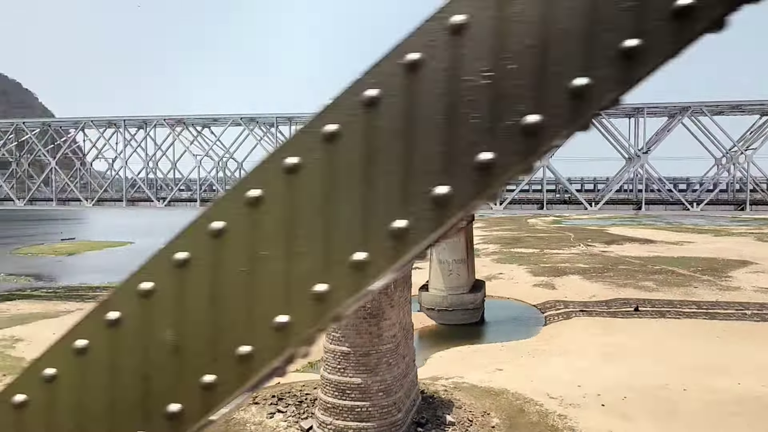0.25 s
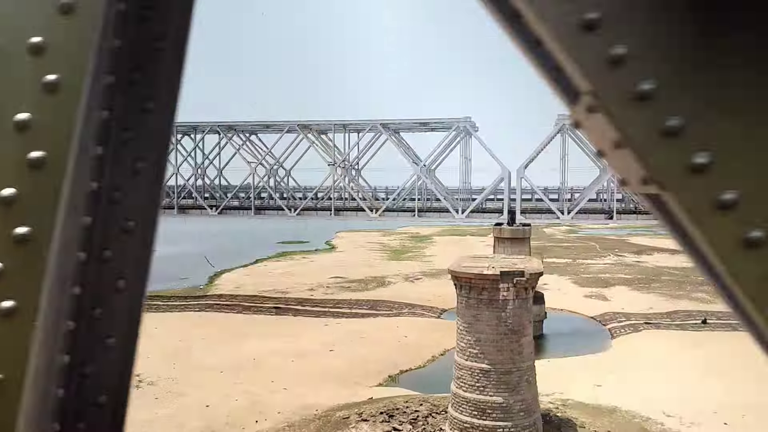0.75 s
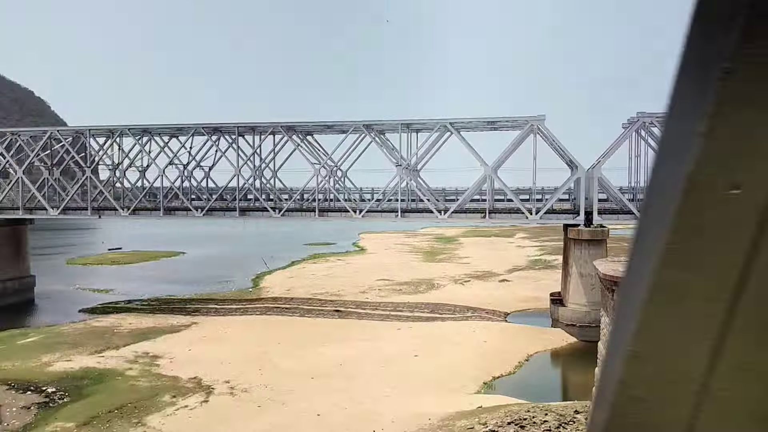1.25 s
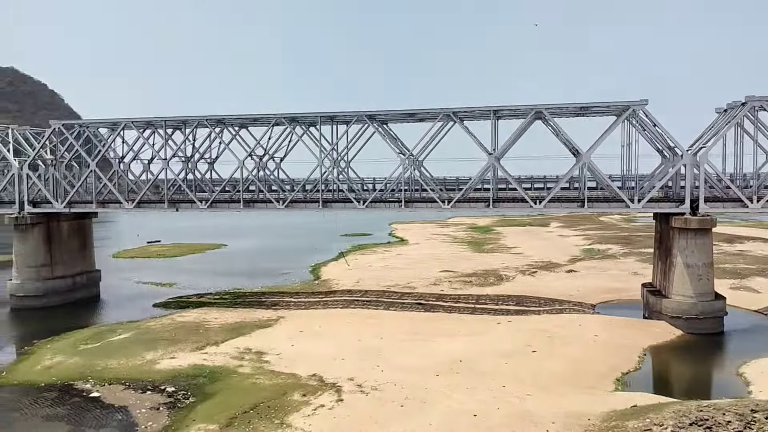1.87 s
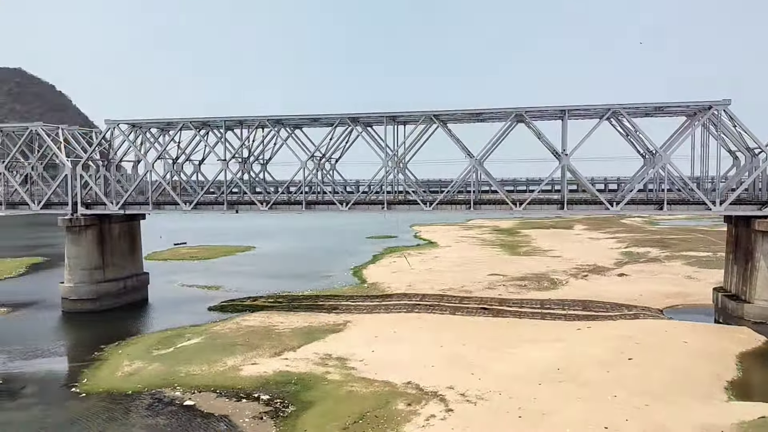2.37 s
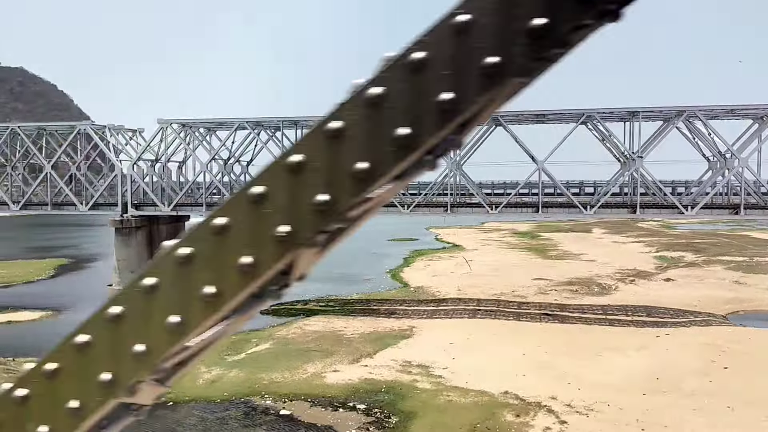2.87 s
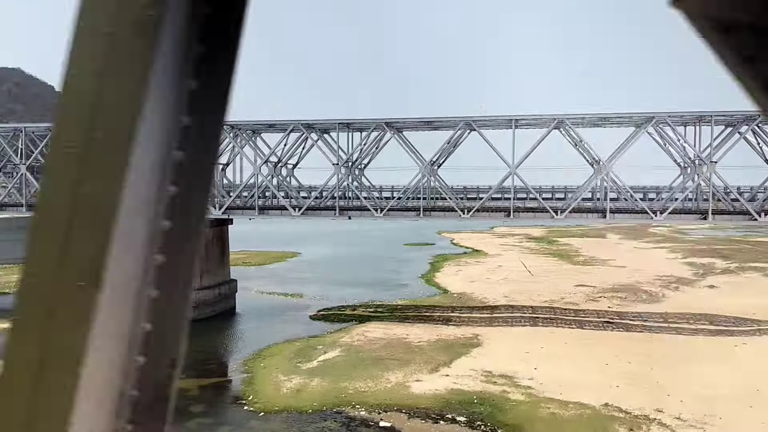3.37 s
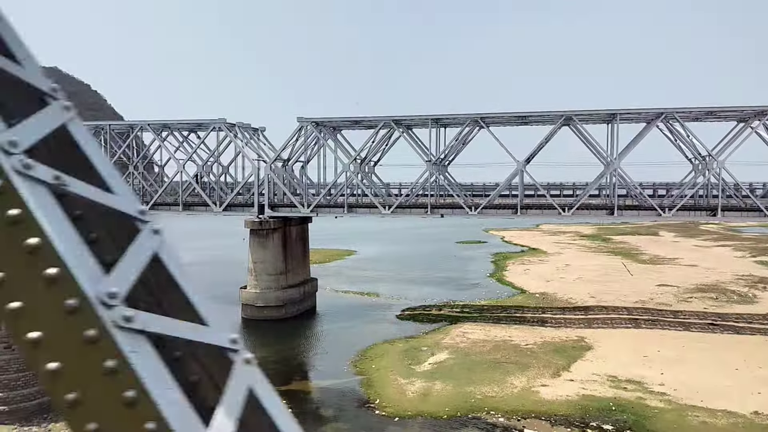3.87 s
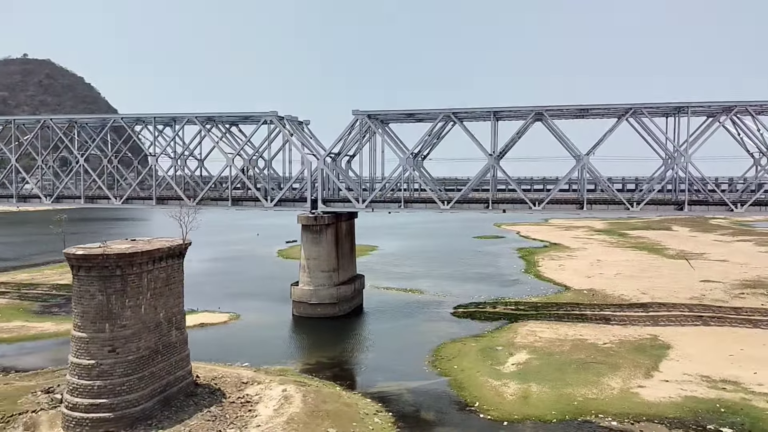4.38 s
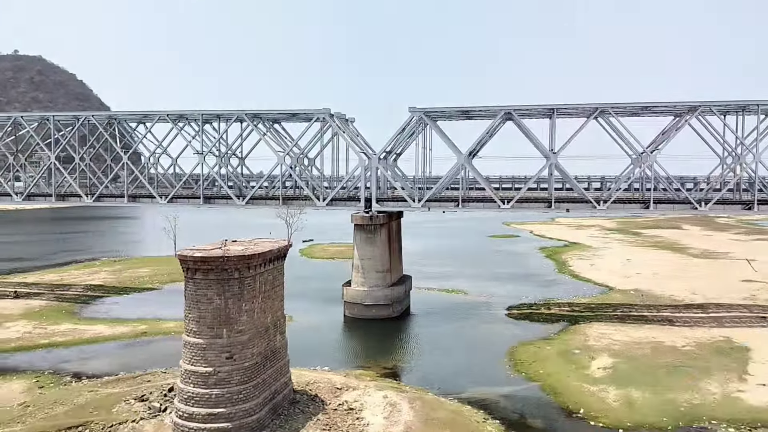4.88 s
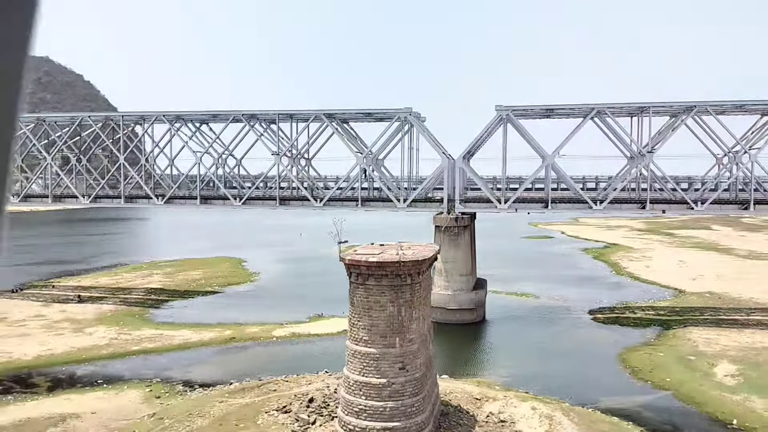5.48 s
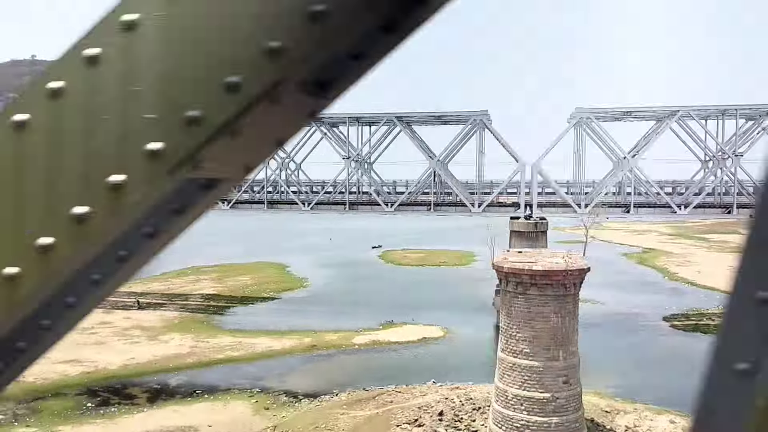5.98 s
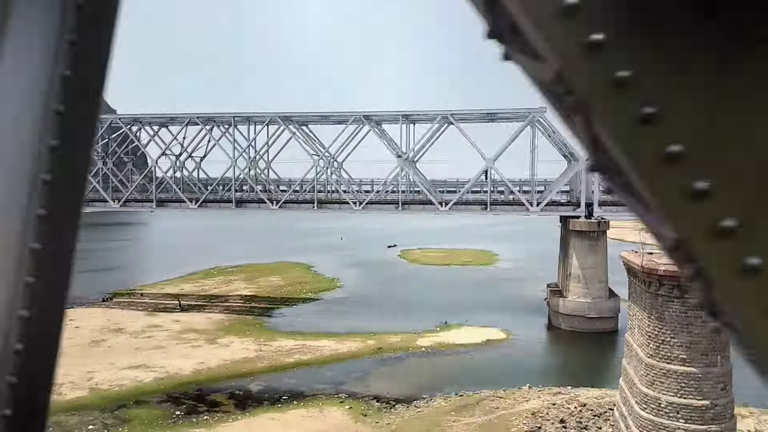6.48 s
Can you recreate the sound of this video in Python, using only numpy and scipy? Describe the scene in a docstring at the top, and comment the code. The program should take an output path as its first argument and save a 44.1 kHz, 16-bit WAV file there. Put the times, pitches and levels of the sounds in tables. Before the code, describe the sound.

A passenger train crosses a steel truss bridge, heard from inside the coach by an open window. The deck booms under the wheels while the rails roar and hiss. Quick, uneven thumps set loose steel rattling, with the brightest crashes about a second in. The clatter eases, a few faint squeaks pass, and heavier knocks return near the end. Light wind buffets the microphone.

```python
"""Coach on a steel truss bridge

Heard by an open window, the deck booms under the wheels while the rails roar and hiss. Each wheel that
strikes a joint or sleeper plate sets loose steel rattling, with a few squeaks, pings and ticks. The coach
resonates at a few pitches; the two microphone ports agree only in the bass, and wind buffets them."""
import sys
import numpy as np
from scipy import signal
from scipy.fft import rfft, irfft, next_fast_len
from scipy.io import wavfile
from scipy.ndimage import uniform_filter1d, map_coordinates

SR = 44100
rng = np.random.default_rng(int(sys.argv[2]) if len(sys.argv) > 2 else 0)


def pcm_store(signal):
    """Save signal as 16-bit PCM."""
    levels = np.round(np.clip(np.atleast_2d(signal), -1, 1) * 32767)
    wavfile.write(sys.argv[1], SR, levels.astype(np.int16).T)


N = 297234

# Vibration of the bridge: (time [s], girder throb [dB], deck boom [dB])
DECK_LEVELS = [(0.0, -24, -17), (0.17, -24, -16.5), (0.3, -18, -12), (0.5, -25, -17), (0.75, -19.5, -15.5),
               (1.15, -32, -20.5), (1.3, -25, -15), (1.65, -32.5, -24), (2.15, -32, -21.5),
               (2.45, -30.5, -22), (3.35, -28, -21), (3.8, -28, -19.5), (4.05, -25.5, -21.5),
               (4.6, -24.5, -16), (5.05, -26.5, -19.5), (5.5, -17, -15.5), (5.85, -25, -16),
               (6.1, -25, -21.5), (6.32, -24.5, -20), (6.74, -24, -21)]
# One brief dip in the boom: (centre [s], half length [s], gain [dB])
BOOM_DIP = (0.12, 0.038, -11.5)
# Rolling noise: (time [s], roar [dB], hiss [dB])
ROLLING_LEVELS = [(0.0, -18, -37), (0.2, -24.5, -39.5), (0.8, -18.5, -30.5), (1.1, -24.5, -40),
                  (1.6, -25.5, -46), (2.5, -23, -44.5), (3.3, -21.5, -44), (4.1, -21, -39.5),
                  (4.6, -19.5, -41), (5.2, -21, -40.5), (5.6, -22.5, -40), (5.9, -20, -37), (6.2, -27, -45),
                  (6.74, -25.5, -45)]
# Puffs of wind: (time [s], level [dB], half length [s])
WIND_PUFFS = [(0.08, -16, 0.021), (.24, -27, .05), (3.9, -34, .03), (4.158, -26, .025), (4.46, -33, .03),
              (5.77, -27, 0.026)]
# Wheel impacts: (time [s], crash [dB], thud [dB], rise [s], nominal t60 [s])
WHEEL_BLOWS = [(0.171, -28.5, -12, .024, 0.99), (0.318, -24, -15, 0.014, 0.46),
               (0.492, -24.5, -30, 0.067, 0.86), (0.608, -22, -18, .04, 0.68),
               (0.681, -14, -7, 0.012, 0.21), (0.75, -13.5, -26, .038, 0.12),
               (0.835, -28.5, -14.5, 0.019, .72), (0.93, -19.5, -13.5, 0.031, 0.32),
               (0.987, -18.5, -33, 0.04, 0.25), (1.094, -31, -19.5, .006, 0.59),
               (1.154, -20, -14, 0.05, .29), (1.264, -34, -20.5, 0.0031, 0.92),
               (1.411, -28, -14, 0.047, 0.33), (1.798, -29, -17, 0.038, 0.19), (2.095, -41, -21, 0.018, 1),
               (2.257, -32.5, -17, .044, 0.34), (2.423, -30.5, -16.5, 0.023, 0.17),
               (2.557, -34.5, -21, 0.036, .2), (2.703, -38.5, -20, .008, .37),
               (2.854, -30, -10, 0.035, 0.21), (3.006, -36, -17.5, .041, 0.29),
               (3.295, -37.5, -26.5, .024, 0.93), (3.445, -29.5, -11, 0.068, 0.38),
               (3.498, -26, -22, .045, 0.16), (3.845, -41, -29, .005, .7), (3.978, -29, -15, 0.015, .19),
               (4.027, -25, -9, 0.023, 0.14), (4.171, -28, -10.5, .027, 0.12),
               (4.249, -32, -20, .022, 0.23), (4.312, -37.5, -22, .007, .43),
               (4.385, -28, -19, 0.036, 0.21), (4.485, -36.5, -24, 0.047, 1), (4.725, -22, -19, 0.048, .19),
               (4.887, -30, -33, .006, 0.18), (4.91, -22, -21, .01, .092), (5.17, -36, -19, 0.0079, 0.53),
               (5.266, -25, -10, .055, 0.79), (5.396, -27, -16.5, 0.016, 1),
               (5.656, -22.5, -21, 0.063, 0.4), (5.728, -30, -13.5, .011, .8),
               (5.765, -29, -26, .011, 0.91), (5.887, -23, -8.5, 0.041, 0.5),
               (5.95, -18.5, -20, 0.052, 0.44), (6.126, -29.5, -14.5, .049, .74),
               (6.265, -26.5, -14.5, 0.017, 0.72), (6.414, -27.5, -14, 0.026, 0.51),
               (6.642, -32, -12.5, .013, .09)]
# Hard jolts of the axles on the deck: (time [s], peak [dB])
HARD_JOLTS = [(0.179, -8), (0.248, -8), (0.3, -8), (0.362, -6), (0.422, -7.5), (0.641, -14.5), (0.722, -5),
              (0.873, -5), (0.967, -5), (1.183, -12.5), (1.281, -3.5), (1.38, -10.5), (1.435, -10),
              (1.629, -12.5), (2.244, -6), (2.388, -11), (2.486, -8), (2.788, -10), (2.862, -10.5),
              (3.342, -13), (3.476, -12), (3.761, -7), (3.885, -9), (3.908, -6.5), (4.024, -3.5),
              (4.077, -7.5), (4.416, -4.5), (4.58, -8), (4.698, -5), (4.76, -6), (5.004, -11), (5.176, -7),
              (5.279, -13), (5.398, -4.5), (5.459, -4.5), (5.535, -9), (5.582, -5.5), (5.652, -17),
              (5.752, -1.5), (5.879, -9), (5.992, -5.5), (6.253, -9), (6.539, -10)]
# Modes of the deck plates: (frequency [Hz], relative level [dB], t60 [s])
DECK_MODES = [(80.5, -8.5, 0.14), (118.2, 0.5, 0.19), (151, -6, 0.13), (230, -9.5, 0.073), (310, -8, 0.077),
              (441, -14, 0.064)]
# Squeaks and pings, plus two short bright ticks of fizz on wheel impacts:
# (time [s], frequency [Hz], linewidth [Hz], level [dB], length [s])
SQUEAKS_AND_TICKS = [(0.69, 5990, 900, -17, 0.011), (0.937, 11900, 1000, -38, 0.028),
                     (.99, 12000, 1200, -44, 0.077), (3.207, 4200, 150, -43, 0.042),
                     (3.985, 14200, 2500, -50, .03), (4.03, 4300, 150, -40, 0.035),
                     (4.306, 4250, 150, -36, .05), (4.375, 4230, 100, -43, 0.043),
                     (4.91, 14000, 2500, -56, .03)]

# Spectra of the noise bands: (frequency [Hz], relative density [dB])
THROB_SPECTRUM = [(12, -50), (20, -29), (38, -16.5), (64, -3), (92, -4.5), (120, -35), (200, -120)]
BOOM_SPECTRUM = [(54, -41), (92, -6), (124, 0.5), (194, -5.5), (230, -11), (300, -54), (510, -120)]
ROAR_SPECTRUM = [(140, -32), (230, 1.5), (448, -6.5), (485, -11), (667, -7.5), (744, -12.5), (905, -11),
                 (1300, -19), (1690, -59), (2860, -120)]
RING_SPECTRUM = [(760, -14.5), (1300, -5.5), (1460, -2), (2270, -2.5), (3000, -9), (3900, -36),
                 (6600, -120)]
HISS_SPECTRUM = [(1760, -28), (3000, -3.5), (3720, -3.5), (4100, -3), (6110, -9.5), (8200, -20.5),
                 (10700, -56), (18000, -120)]
FIZZ_SPECTRUM = [(4820, -18), (8200, -10.5), (8810, -2), (12300, -5.5), (15600, -13)]
WIND_SPECTRUM = [(12, -30), (25, 2), (120, -3), (250, -18), (500, -60)]
THUD_SPECTRUM = [(140, -19.5), (230, -1), (402, -5.5), (448, -6.5), (489, -6.5), (898, -14), (1300, -20),
                 (1690, -51), (2860, -120)]
CLANG_SPECTRUM = [(760, -18), (1300, -0.5), (1590, -1), (2310, 1), (3000, -4.5), (3900, -33), (6600, -120)]
CRASH_SPECTRUM = [(1760, -21.5), (3000, -3.5), (4340, -3.5), (5380, -8.5), (6130, -7.5), (8200, -19),
                  (10700, -50), (18000, -120)]

# Coach modes, in phase and in antiphase at the ports: (frequency [Hz], bandwidth [Hz], gain [dB])
IN_PHASE_MODES = [(79.5, 16, 5.5), (121.5, 28, 7.5), (165, 24, 6.5), (293, 31, 4.5), (446.4, 12.4, 4.5),
                  (609, 21, 2), (678, 20, 1.5), (881, 16, 7), (932, 39, 4.5), (1190, 49, 4),
                  (2360, 100, 1.5), (4250, 180, 0), (5740, 450, -0.5), (12000, 700, 2.5)]
ANTIPHASE_MODES = [(120, 27, 4), (293, 50, 7.8), (418, 26, 7), (612, 37, 3), (974, 97, 4.2),
                   (1200, 67, 2.6)]
# Stereo width of the sound field: (frequency [Hz], side over mid [dB])
SIDE_LEVELS = [(60, -24), (110, -24.5), (200, -17.5), (380, -7.5), (700, -3), (1290, 2), (2380, -0.5),
               (4400, 0.5), (8120, 0), (15000, 1.5)]
# Bias toward the window: (frequency [Hz], left over right [dB])
WINDOW_BIAS = [(60, 0), (110, 1), (200, 2), (380, 2.5), (700, 1.5), (1290, 3), (2380, 3), (4400, 1),
               (8120, 1), (15000, 7)]


def amp(db):
    """Amplitude ratio of a level in decibels."""
    return 10 ** (np.asarray(db) / 20)


def unit_rms(x):
    """The signal normalised to rms 1."""
    return x / np.sqrt(np.mean(x ** 2) + 1e-20)


def level_at(points, hz):
    """Interpolation of levels on a logarithmic frequency axis."""
    frequencies, levels = np.transpose(points)
    return np.interp(np.log(hz + 1), np.log(frequencies + 1), levels)


def envelopes(rows):
    """Linear interpolation in time: each level column at every sample."""
    times, *columns = np.transpose(rows)
    return [np.interp(np.arange(N) / SR, times, column) for column in columns]


def wobble(rate_hz):
    """Smooth random modulation: a spline through Gaussian knots."""
    knots = rng.standard_normal(int(N * rate_hz / SR) + 4)
    return map_coordinates(knots, [np.arange(N) * rate_hz / SR])


def filtered(x, response):
    """Linear filtering: the spectrum is multiplied by a frequency response."""
    size = next_fast_len(N + SR // 2)
    return irfft(rfft(x, size) * response(np.fft.rfftfreq(size, 1 / SR)), size)[..., :N]


def resonances(modes, hz):
    """Superposition of the direct sound and damped second-order resonances."""
    return 1 + sum((amp(db) - 1) * 1j * hz * width / (centre ** 2 - hz ** 2 + 1j * hz * width)
                   for centre, width, db in modes)


def coach_response(hz):
    """Cavity modes: those in phase at the ports colour the mid, those across the coach the side."""
    mid = resonances(IN_PHASE_MODES, hz)
    side = resonances(ANTIPHASE_MODES, hz) * amp(level_at(SIDE_LEVELS, hz))
    return np.array([mid, side])


def steel_noise(spectrum, patchy_db, grain_db):
    """Many tiny impacts sum to rough noise, filtered by the coach; stereo, rms 1."""
    grains = rng.standard_normal((2, N)) * amp(grain_db * wobble(400))
    spectrogram = signal.stft(grains, nperseg=512)[2]
    patches = uniform_filter1d(rng.standard_normal(spectrogram.shape[1:]), 5, axis=0)  # over frequency
    patches = uniform_filter1d(patches, 8, axis=1)  # over time
    rattle = signal.istft(spectrogram * amp(patchy_db * unit_rms(patches)), nperseg=512)[1][:, :N]
    mid, side = filtered(rattle, lambda hz: amp(level_at(spectrum, hz)) * coach_response(hz))
    return unit_rms(np.array([mid + side, mid - side]))


def deck_rumble():
    """Forced vibration: the moving load makes the girders throb and the deck plates boom."""
    throb_db, boom_db = envelopes(DECK_LEVELS)
    centre, half_length, dip_db = BOOM_DIP
    dip = amp(dip_db * np.exp(-((np.arange(N) / SR - centre) / half_length) ** 4))
    throb = amp(throb_db) * steel_noise(THROB_SPECTRUM, patchy_db=-1.8, grain_db=-0.8)
    boom = amp(boom_db) * steel_noise(BOOM_SPECTRUM, patchy_db=0.07, grain_db=0.3)
    return throb + dip * boom


def rolling_noise():
    """Roughness excitation: uneven wheels and rails drive four bands that waver together."""
    roar_db, hiss_db = envelopes(ROLLING_LEVELS)
    ring_db = 0.47 * roar_db + 0.53 * hiss_db - 1.5
    fizz_db = hiss_db - 20.5
    uneven = wobble(rate_hz=16)
    roar = amp(roar_db + 0.5 * uneven) * steel_noise(ROAR_SPECTRUM, patchy_db=0.77, grain_db=0.66)
    ring = amp(ring_db + 0.36 * uneven) * steel_noise(RING_SPECTRUM, patchy_db=1.5, grain_db=1.1)
    hiss = amp(hiss_db + 0.52 * uneven) * steel_noise(HISS_SPECTRUM, patchy_db=1.76, grain_db=0.6)
    fizz = amp(fizz_db + 0.6 * uneven) * steel_noise(FIZZ_SPECTRUM, patchy_db=0.7, grain_db=1.5)
    return roar + ring + hiss + fizz


def wind_buffeting():
    """Turbulent pressure: eddies uncorrelated at the two ports, plus a few puffs in antiphase."""
    t = np.arange(N) / SR
    eddies = unit_rms(filtered(rng.standard_normal((3, N)), lambda hz: amp(level_at(WIND_SPECTRUM, hz))))
    buffets = amp(-41 + 2.1 * np.array([wobble(7), wobble(4.1)]))
    puffs = sum(amp(db) * np.exp(-((t - centre) / half) ** 2) for centre, db, half in WIND_PUFFS)
    return buffets * eddies[:2] + puffs * eddies[2] * np.array([[1], [-1]])


def wheel_clatter():
    """Each blow swells as it spreads through the steel, then decays; incoherent blows add in power."""
    power = np.zeros((4, N + SR))
    t = np.arange(SR * 3 // 4) / SR
    for start, crash_db, thud_db, rise, t60 in WHEEL_BLOWS:
        clang_db = crash_db + 4
        fizz_db = crash_db - 17.5 + 0.1 * (crash_db + 30)  # harder blows are brighter
        band_db = np.array([thud_db, clang_db, crash_db, fizz_db])[:, None]
        band_t60 = max(t60, 0.03) * np.array([[1.15], [1.1], [1], [0.9]])  # treble dies first
        envelope = (1 - np.exp(-t / rise)) * amp(band_db - 60 * t / band_t60)
        power[:, round(start * SR):][:, :len(t)] += envelope ** 2
    thud, clang, crash, fizz = np.sqrt(power[:, :N])
    return (thud * steel_noise(THUD_SPECTRUM, patchy_db=1.43, grain_db=0.1)
            + clang * steel_noise(CLANG_SPECTRUM, patchy_db=0.37, grain_db=-0.4)
            + crash * steel_noise(CRASH_SPECTRUM, patchy_db=1.0, grain_db=-0.4)
            + fizz * steel_noise(FIZZ_SPECTRUM, patchy_db=1.0, grain_db=1.0))


def light_jolts():
    """A jittered impulse train whose strength follows the boom: (time [s], peak [dB])."""
    count, spacing_s, clearance_s = 80, 0.13, 0.05
    over_boom_db, scatter_db = 5, 4
    times, _, boom_db = np.transpose(DECK_LEVELS)
    jitter, scatter = rng.uniform(-1, 1, size=(count, 2)).T
    starts = spacing_s * (np.arange(count) + 1 + jitter / 2)
    peak_db = np.interp(starts, times, boom_db) + over_boom_db + scatter_db * scatter
    gap_to_hard = np.abs(starts[:, None] - np.transpose(HARD_JOLTS)[0]).min(axis=1)
    keep = (gap_to_hard > clearance_s) & (starts < N / SR)
    return list(zip(starts[keep], peak_db[keep]))


def axle_thumps():
    """Damped free vibration: each jolt rings the deck modes at new strengths, alike at both ports."""
    out = np.zeros(N + SR)
    t = np.arange(SR // 4) / SR
    rise_s, in_phase_s = 0.007, 0.016  # the modes line up shortly after contact
    for start, peak_db in HARD_JOLTS + light_jolts():
        phase = rng.uniform(0, 2 * np.pi)  # push or pull
        ring = np.zeros(len(t))
        for hz, db, t60 in DECK_MODES:
            decay = amp(db + rng.normal(0, 2.7) - 60 * t / t60)
            detuned_hz = hz * rng.normal(1, 0.045)
            ring += decay * np.cos(2 * np.pi * detuned_hz * (t - in_phase_s) + phase)
        ring *= (1 - np.exp(-t / rise_s)) ** 2
        out[round(start * SR):][:len(t)] += amp(peak_db) * ring / np.abs(ring).max()
    return out[:N]


def squeaks_and_ticks():
    """Phase diffusion broadens short tones: narrow lines squeak or ping, the widest are ticks of fizz."""
    out = np.zeros((2, N))
    for start, hz, width_hz, db, length in SQUEAKS_AND_TICKS:
        t = np.arange(round(length * SR)) / SR
        phase_steps = rng.normal(0, np.sqrt(2 * np.pi * width_hz / SR), (2, len(t)))
        tone = np.sin(2 * np.pi * hz * t + np.cumsum(phase_steps, axis=1))
        out[:, round(start * SR):][:, :len(t)] += amp(db) * np.sin(np.pi * t / length) * tone
    return out


def scene():
    """Superposition of the sources; the train is louder at the left port, which faces the window."""
    train = deck_rumble() + axle_thumps() + rolling_noise() + wheel_clatter() + squeaks_and_ticks()
    split = np.array([[0.5], [-0.5]])  # half the bias raises the left, half lowers the right
    at_ports = filtered(train, lambda hz: amp(split * level_at(WINDOW_BIAS, hz)))
    return at_ports + wind_buffeting()


def record(dry):
    """Saturation rounds off the loudest booms, and a low-pass filter limits the band."""
    ceiling, cutoff_hz = 1.1, 15750
    saturated = dry / (1 + np.abs(dry / ceiling) ** 6) ** (1 / 6)
    return filtered(saturated, lambda hz: hz < cutoff_hz)


dry = scene()
out = record(dry)
pcm_store(out)
```